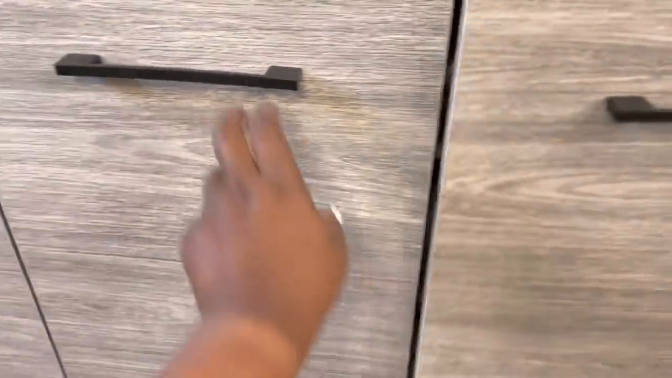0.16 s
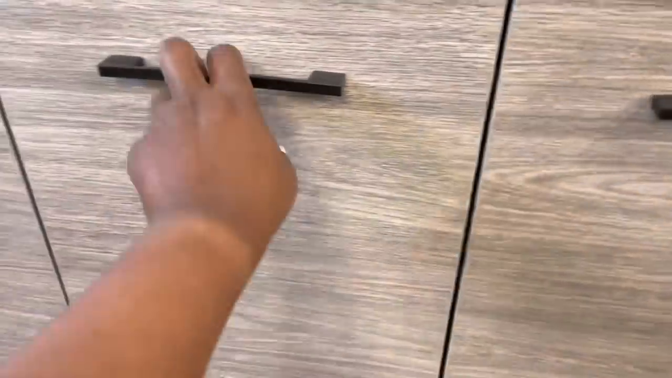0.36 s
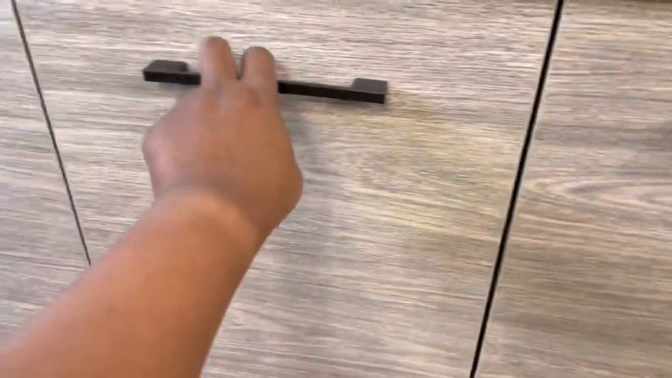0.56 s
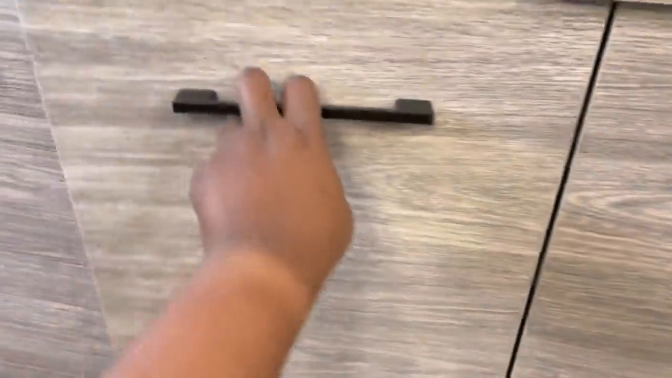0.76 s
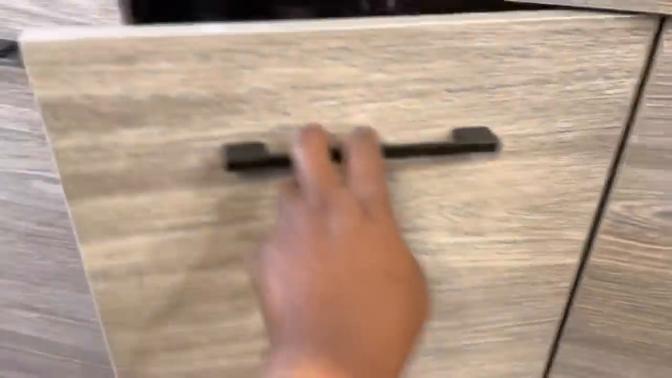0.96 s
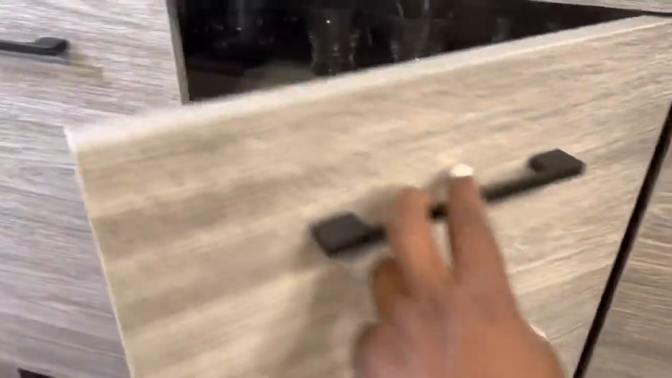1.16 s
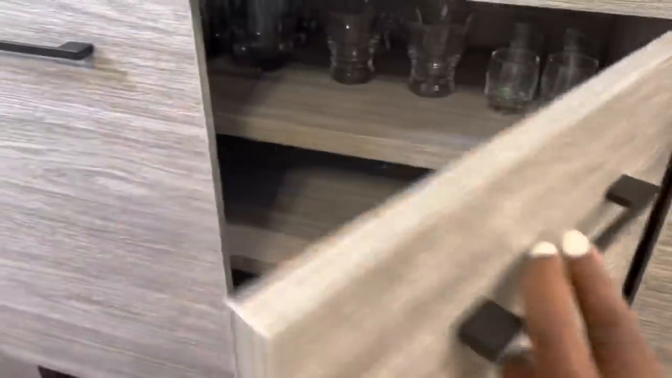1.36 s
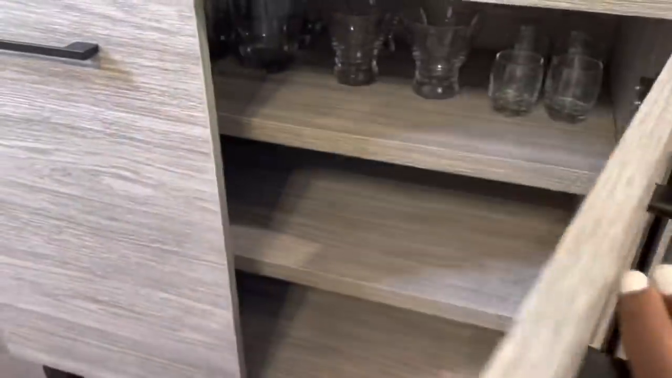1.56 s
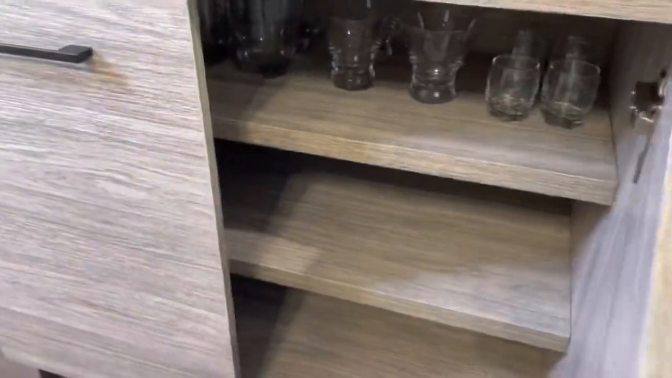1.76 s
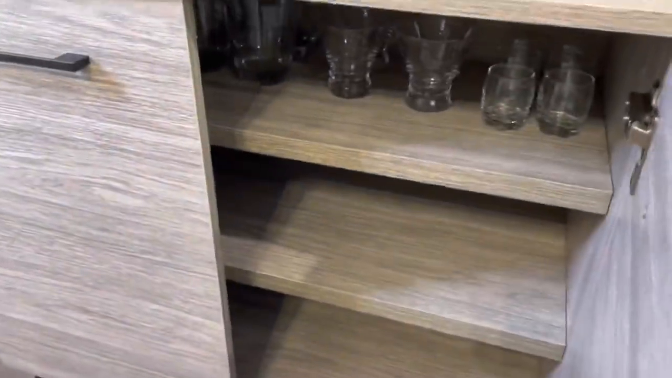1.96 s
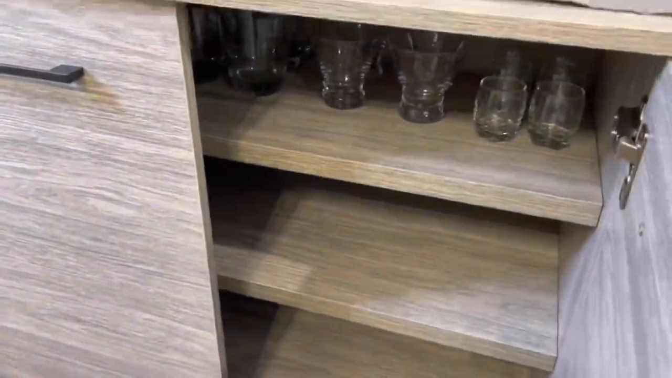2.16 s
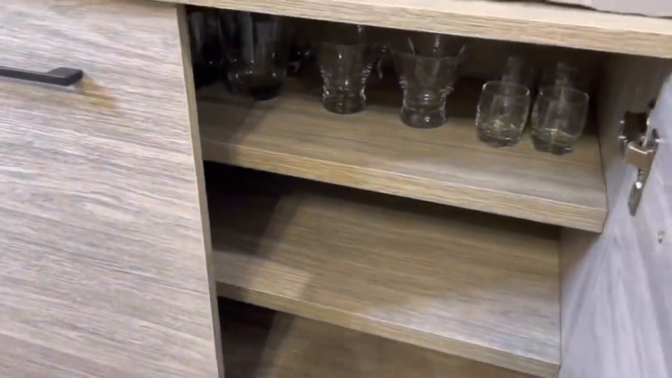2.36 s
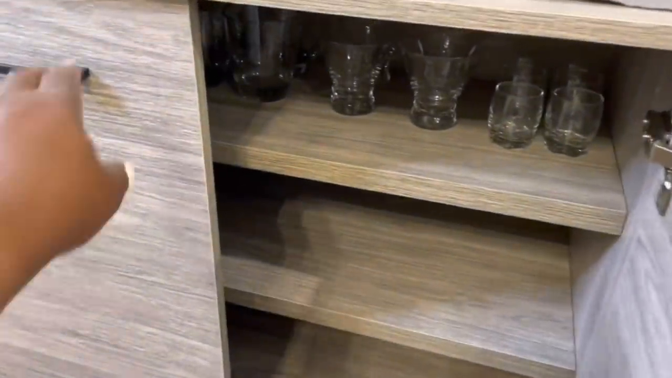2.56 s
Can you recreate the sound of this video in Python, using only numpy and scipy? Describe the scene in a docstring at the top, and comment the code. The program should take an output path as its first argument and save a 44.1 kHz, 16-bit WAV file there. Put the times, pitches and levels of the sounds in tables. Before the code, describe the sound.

One loud, booming knock of a wooden cupboard door, followed by faint hinge noise and ticks.

```python
"""A quiet room hums with a compressor; a soft rustle, a tick and a low bump come first. At 0.2 s a wooden
cabinet door knocks shut close by: a light touch, then a quick clatter of blows that make the panel ring.
The cabinet booms and throbs as it dies, because two of its low notes are close in pitch. From 1 s come
a faint swish, a metallic hinge hiss and a few more ticks; rustle and hiss rise again at the very end."""
import sys
import numpy as np
from scipy import signal
from scipy.io import wavfile
from scipy.ndimage import uniform_filter1d

SR = 44100
rng = np.random.default_rng(int(sys.argv[2]) if len(sys.argv) > 2 else 0)


def log_audio(samples):
    """Write samples as a 16-bit WAV file to the path given in sys.argv[1]."""
    # one column per channel
    frames = np.atleast_2d(samples).T
    # limit to full scale, then quantise
    limited = np.clip(frames, -1, 1)
    pcm = np.round(limited * 32767).astype(np.int16)
    wavfile.write(sys.argv[1], SR, pcm)


N = 114660
T = np.arange(N) / SR

# How alike the left and right sides are (1 same, -1 opposite): f/Hz, likeness
BACKGROUND_LIKENESS = [(60, 0.73), (180, 0.94), (550, -0.13), (1650, 0.32), (4970, -0.3), (15000, 1)]
NEAR_LIKENESS = [(100, .98), (250, .9), (600, .55), (1200, .35), (2500, .5), (5000, .4), (8500, -.7),
                 (12000, .75)]
# Tone colour of each noise, from bass to treble: f/Hz, level/dB
AIR_COLOUR = [(20, -5), (35, -6.5), (60, -2.5), (100, -9), (140, -9.5), (350, -8.5), (600, -19.5),
              (1000, -34), (2000, -47.5), (5000, -48), (9000, -56), (13000, -53.5), (15700, -55.5)]
RUSTLE_COLOUR = [(350, -25), (700, -5.5), (1100, 3), (1500, -7), (1850, -5), (2400, -15), (4200, -18),
                 (5000, -29), (15700, -37.5)]
ECHO_COLOUR = [(60, -8.5), (130, 1), (250, -8), (600, -4.5), (1400, -2.5), (3000, -3.5), (6000, 1.5),
               (7200, 4), (8800, -14), (12000, 1)]
TOUCH_COLOUR = [(1000, -25), (2500, -7), (4800, 0), (6800, 0), (8500, -13), (12000, -17), (15500, -19)]
CRACK_COLOUR = [(150, -31), (400, -7.5), (1000, -7), (2400, -8), (4500, -21.5), (7000, -28), (8700, -44.5),
                (11700, -38), (15500, -52.5)]
# The compressor's tones: multiple of its lowest pitch, level/dB
HUM_TONES = [(1, -67.5), (2, -54), (4, -62.5), (5, -71), (6, -70)]
# Fuzzy tones, each a band of noise: f/Hz, width/Hz, level/dB
DRONE_BANDS = [(62, 14, -59.5), (175.6, 12, -65.5)]
SWISH_BANDS = [(2460, 700, 1.5), (4360, 600, -5.5), (13000, 3000, -6)]
SQUEAK_BANDS = [(2470, 110, -1.5), (3360, 110, -6), (3920, 3000, -2), (6030, 200, -15.5)]
HISS_BANDS = [(7800, 300, -13), (9340, 300, -6.5), (11750, 300, 0.5), (13700, 2700, 3), (15400, 300, -1.5)]
# How the rustle and the swish swell and fade: t/s, level/dB
RUSTLE_LEVELS = [(0, -77), (.03, -68), (.2, -61), (.3, -71), (1, -76), (1.18, -79), (1.45, -79.5),
                 (1.7, -76), (1.9, -76.5), (1.97, -70.5), (2.07, -69.5), (2.14, -79.5), (2.25, -87),
                 (2.45, -90.5), (2.5, -76), (2.6, -68.5)]
SWISH_LEVELS = [(.95, -100), (1.05, -84), (1.19, -78.5), (1.3, -81), (1.42, -85), (1.5, -100), (1.9, -100),
                (1.97, -79), (2.1, -93), (2.2, -105)]
# How the hinge swells and fades: t/s, squeak level/dB, hiss level/dB
HINGE_LEVELS = [(1.5, -100, -95.5), (1.57, -86, -102), (1.63, -77, -77), (1.75, -73, -73), (1.8, -76, -84),
                (1.87, -82.5, -92), (1.9, -78, -72), (1.93, -74, -83.5), (1.98, -89, -100),
                (2.46, -105, -100), (2.6, -100, -80)]
# Small ticks and one low bump: t/s, level/dB, f/Hz
TICK_EVENTS = [(.034, -64, 1200), (.034, -68, 3100), (.045, -44, 68), (.521, -60, 5500), (1.709, -51, 600),
               (2.025, -52, 650), (2.270, -61, 1700), (2.270, -70, 4500)]
# How long the room echoes: f/Hz, time to fade by 60 dB/s
ECHO_TIMES = [(100, .5), (250, 0.88), (600, 0.86), (1400, 0.97), (3000, 0.81), (5500, .5), (7200, .45),
              (8800, .2), (12000, 0.4)]
# Notes the wood rings at when struck: f/Hz, level/dB, time to fade by 60 dB/s
CABINET_NOTES = [(42.3, -28.5, 0.8), (70, -11.5, 0.62), (79.05, -7, .45)]
PANEL_NOTES = [(155, -1, .12), (176.6, -6.5, .15), (233, 9.5, 0.19), (274.3, -4.5, 0.12), (341, 4, 0.068),
               (371.9, -2.5, 0.08), (467.5, 1.5, 0.069), (533, -0.5, 0.12), (1066, -3, 0.095),
               (1633, -13, .07), (1976.5, -4, 0.061), (2455, -7, .04)]
# Blows of the door on the frame: t/s, thud level/dB, crack level/dB, crack fade/s, treble cutoff/Hz
DOOR_BLOWS = [(0.2145, -42, -42.5, .004, 2987), (0.2333, -26.5, -6, 0.0019, 9000),
              (0.2357, -28.5, -11.5, 0.0025, 2500), (0.2398, -19, -10, .004, 2500),
              (0.2437, -36.5, -9, 0.0092, 4026), (0.251, -19.5, -13, 0.0044, 2500),
              (0.2555, -29.5, -25, 0.0021, 2000), (0.2664, -19.5, -31, 0.0052, 1500)]

HIT_RISE_S = .00025  # how fast the touch and each blow start


def amp(db):
    """Turn decibels into a number to multiply by."""
    return 10 ** (np.asarray(db) / 20)


def unit_level(x):
    """Scale a signal to an average power of 1."""
    return x / np.sqrt(np.mean(x ** 2) + 1e-20)


def look_up(table, hz):
    """Read a table between its rows, on a pitch scale."""
    f, value = np.transpose(table)
    return np.interp(np.log(hz + 1), np.log(f + 1), value)


def colour(table):
    """Strength at each frequency, from a colour table."""
    return lambda hz: amp(look_up(table, hz))


def peaks(bands):
    """Strength at each frequency, with one hump per band."""
    return lambda hz: np.sqrt(sum(amp(db) ** 2 / width / (1 + (2 * (hz - f) / width) ** 2) ** 2
                                  for f, width, db in bands))


def swell(table, column=1):
    """Strength at each moment, from a level table."""
    return amp(np.interp(T, *np.transpose(table)[[0, column]]))


def add(mix, start_s, sound):
    """Mix a sound in at its start time."""
    part = mix[..., round(start_s * SR):][..., :sound.shape[-1]]
    part += sound[..., :part.shape[-1]]


def stereo(left, other, likeness, hz):
    """Make the right side by blending the left with an unrelated signal."""
    same = np.clip(look_up(likeness, hz), -1, 1)[:, None]
    return np.array([left, same * left + np.sqrt(1 - same ** 2) * other])


def noise(gain, flicker_db, likeness=BACKGROUND_LIKENESS, size=1024):
    """Stereo noise shaped by gain(hz), with patches that grow and fade at random."""
    frames, hz = N * 4 // size + 5, np.fft.rfftfreq(size, 1 / SR)
    a, b, c, d, patches = rng.standard_normal((frames, len(hz), 5)).T
    patches = uniform_filter1d(patches, size=10, axis=0)
    patches = unit_level(uniform_filter1d(patches, size=10, axis=1))
    spectrum = stereo(a + 1j * b, c + 1j * d, likeness, hz)
    spectrum *= gain(hz)[:, None] * amp(flicker_db * patches)
    return unit_level(signal.istft(spectrum, nperseg=size, noverlap=size * 3 // 4)[1][:, :N])


def ring(notes, t):
    """Struck wood rings with several pure notes, each fading at its own speed."""
    return -sum(amp(db - 60 * t / fade_s) * np.sin(2 * np.pi * hz * t) for hz, db, fade_s in notes)


def room_air():
    """The low, soft rush of a quiet room."""
    return amp(-55.5) * noise(colour(AIR_COLOUR), flicker_db=1.5, size=2048)


def compressor_hum(pitch_hz=57.03, mains_hz=59.6, mains_db=-52.5):
    """A compressor's steady tones, the hum of mains power and two fuzzy low tones."""
    tones = [(k * pitch_hz, db) for k, db in HUM_TONES] + [(mains_hz, mains_db)]
    hum = sum(np.sqrt(2) * amp(db) * np.sin(2 * np.pi * (hz * T + rng.random())) for hz, db in tones)
    drone = sum(amp(db) * noise(peaks([(hz, width, 0)]), flicker_db=0, size=16384)
                for hz, width, db in DRONE_BANDS)
    return hum + drone


def rustle():
    """Soft, flickering noise that comes and goes."""
    return swell(RUSTLE_LEVELS) * noise(colour(RUSTLE_COLOUR), flicker_db=2.5)


def door_swish():
    """A faint airy swish as the door swings."""
    return swell(SWISH_LEVELS) * noise(peaks(SWISH_BANDS), flicker_db=1.7)


def hinge():
    """A breathy squeak under a high hiss; narrow bands make it sound like metal."""
    squeak = swell(HINGE_LEVELS) * noise(peaks(SQUEAK_BANDS), flicker_db=.83)
    hiss = swell(HINGE_LEVELS, column=2) * noise(peaks(HISS_BANDS), flicker_db=3.5)
    return squeak + hiss


def ticks(fade_cycles=.55):
    """Tones that die within a few waves: high ones tick, the low one bumps."""
    t, out = T[:SR // 4], np.zeros(N)
    for start_s, db, hz in TICK_EVENTS:
        cycles = hz * t
        shape = 4.5 * cycles * np.exp(-cycles / fade_cycles)
        add(out, start_s, amp(db) * shape * np.sin(2 * np.pi * cycles))
    return out


def room_echo(sound, level_db=-5.5):
    """Thousands of tiny echoes blur into a tail; each pitch fades at its own speed."""
    echoes = np.zeros((2, SR + SR // 2))
    delays = np.arange(200, SR, 10) + rng.integers(0, 10, (2, (SR - 191) // 10))
    np.put_along_axis(echoes, delays, rng.choice([-1., 1.], delays.shape), 1)
    hz, t, (left, other) = signal.stft(echoes, SR, nperseg=512)
    fade = amp(look_up(ECHO_COLOUR, hz)[:, None] - 60 * t / look_up(ECHO_TIMES, hz)[:, None])
    tail = signal.istft(stereo(left, other, NEAR_LIKENESS, hz) * fade, SR, nperseg=512)[1]
    tail /= np.linalg.norm(tail[0])
    return amp(level_db) * signal.fftconvolve(sound.mean(0)[None], tail, axes=1)[:, :N]


def cabinet_boom(start_s=.2562, rise_s=.0054):
    """Two close notes drift in and out of step, so they throb over a deeper one."""
    t, out = T[:SR // 2], np.zeros(N)
    add(out, start_s, (1 - np.exp(-t / rise_s)) * ring(CABINET_NOTES, t))
    return out


def door_touch(start_s=.2152, level_db=-39, fade_s=.0026):
    """The door's first light touch makes a bright click."""
    t, out = T[:SR // 2], np.zeros((2, N))
    click = noise(colour(TOUCH_COLOUR), flicker_db=0, likeness=NEAR_LIKENESS, size=256)
    shape = (1 - np.exp(-t / HIT_RISE_S)) * np.exp(-t / fade_s)
    add(out, start_s, amp(level_db) * shape * click[:, SR:SR + len(t)])
    return out


def door_blows():
    """Each blow rings the panel and has its own brightness, from a sharp crack to a dull thud."""
    t, out = T[:SR // 2], np.zeros((2, N))
    panel = ring(PANEL_NOTES, t)
    rise = 1 - np.exp(-t / HIT_RISE_S)
    grit = noise(colour(CRACK_COLOUR), flicker_db=2.5, likeness=NEAR_LIKENESS, size=256)
    for start_s, thud_db, crack_db, fade_s, cutoff_hz in DOOR_BLOWS:
        crack = amp(crack_db) * grit[:, round(start_s * SR):][:, :len(t)] * np.exp(-t / fade_s)
        blow = rise * (amp(thud_db) * panel + crack)
        dullness = np.exp(-2 * np.pi * cutoff_hz / SR)
        add(out, start_s, signal.lfilter([1 - dullness], [1, -dullness], blow))
    return out


def scene():
    """Mix it all; only the knock and the ticks echo in the room."""
    knock = (door_blows() + door_touch()) * amp([[.6], [-.6]])  # a little louder on the left
    near = knock + ticks()
    echo = room_echo(near)
    background = compressor_hum() + room_air() + rustle() + hinge() + door_swish()
    return background * amp([[.63], [-.63]]) + echo + cabinet_boom() + near


def record(dry):
    """The microphone drops the deepest bass, then the highest treble is cut."""
    bass_hz, treble_hz = 29.7, 15800
    thin = signal.lfilter(*signal.butter(2, bass_hz, "high", fs=SR), dry)
    treble_cut = signal.firwin(511, treble_hz, window=("kaiser", 9), fs=SR)
    return signal.oaconvolve(thin, treble_cut[None], "same")


dry = scene()
out = record(dry)
log_audio(out)
```